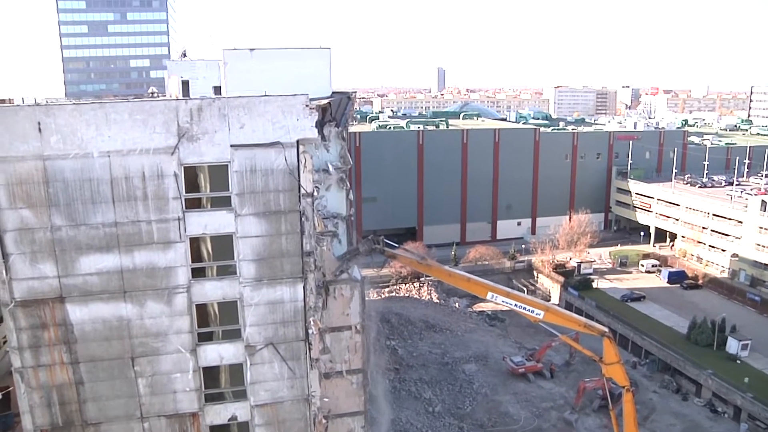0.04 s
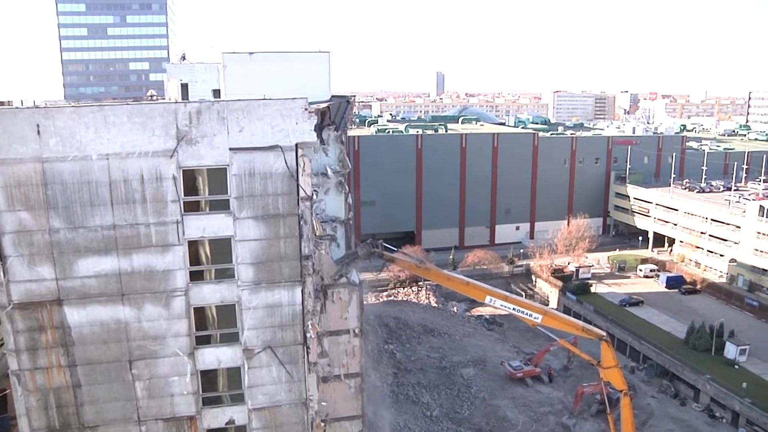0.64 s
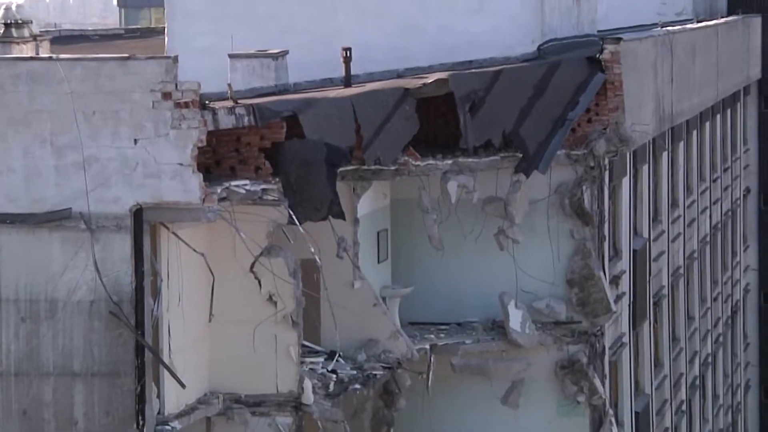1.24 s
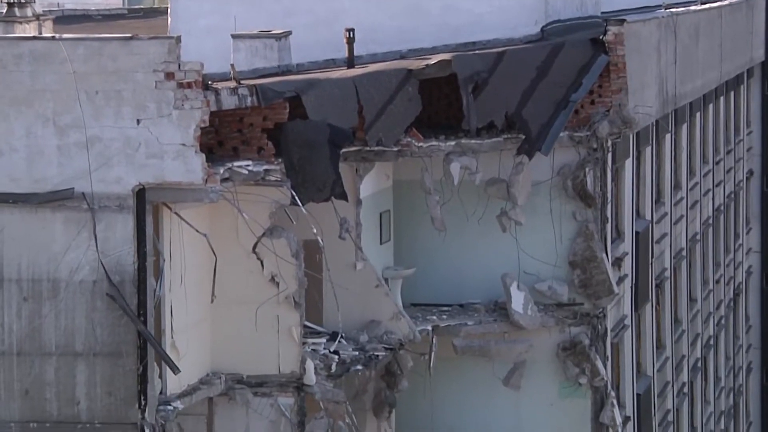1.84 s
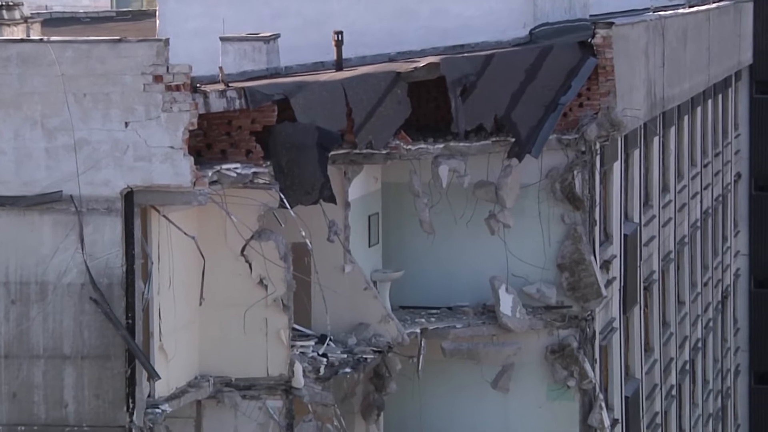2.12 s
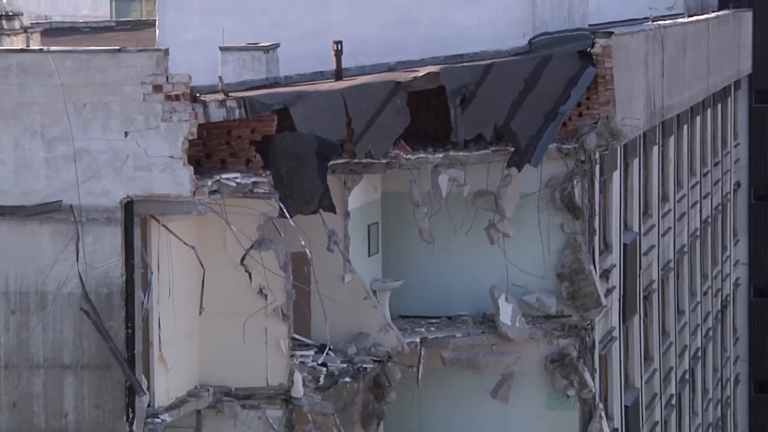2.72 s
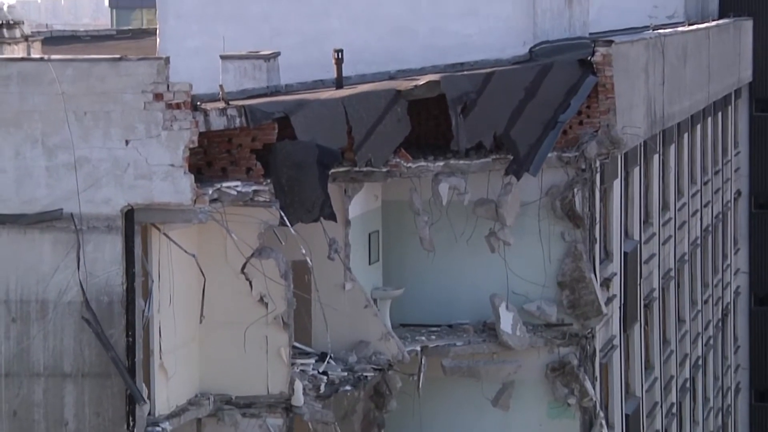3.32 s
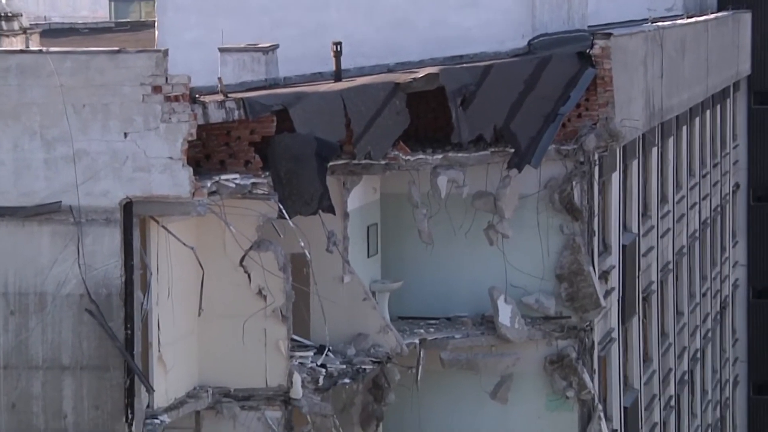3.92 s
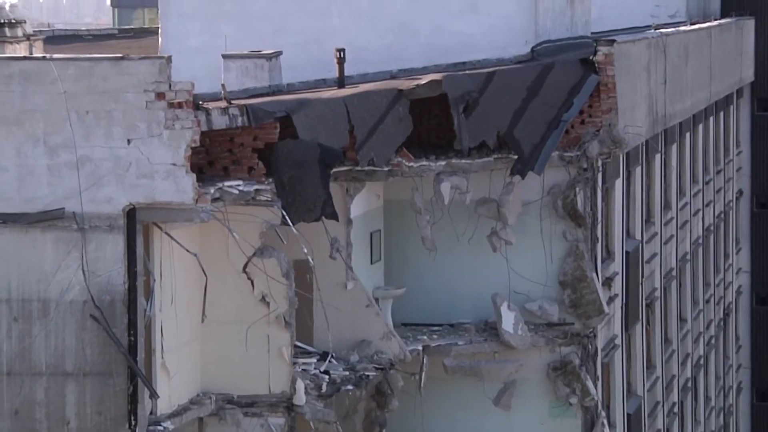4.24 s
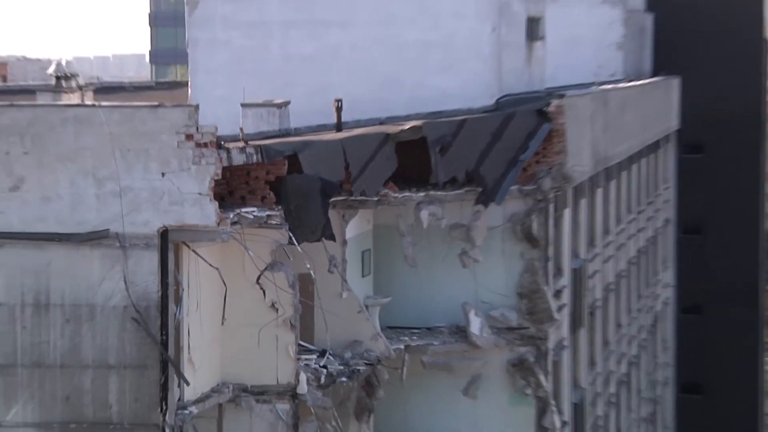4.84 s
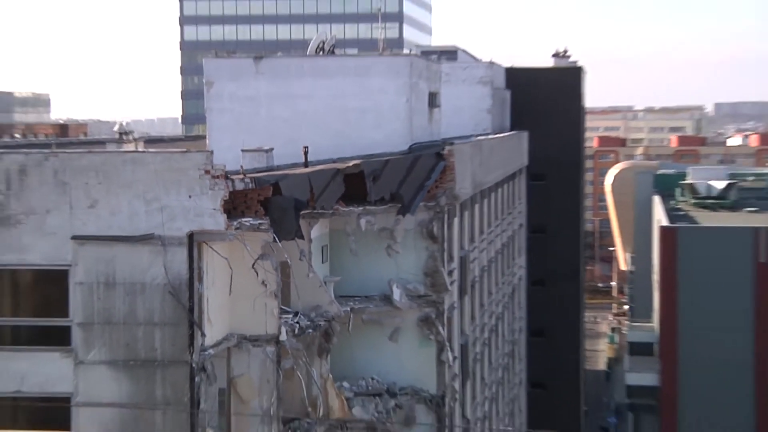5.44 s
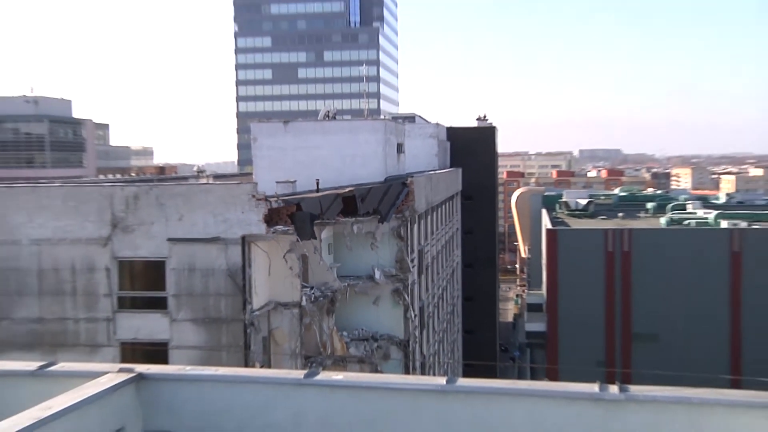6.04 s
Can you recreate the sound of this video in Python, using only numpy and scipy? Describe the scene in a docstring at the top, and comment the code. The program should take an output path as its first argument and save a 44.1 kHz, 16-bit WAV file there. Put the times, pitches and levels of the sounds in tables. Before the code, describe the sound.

A diesel excavator drones under load on a demolition site, with hissing spray, spurts of grit, a jolt and a few clanks. At 0.7 seconds this cuts abruptly to quieter distant traffic and the wavering hum of idling diesels. From 1 second, masonry tumbles down a building: bricks pour in surges, grit crackles and lumps land with dead knocks. Heavy slabs thud onto floors between 1.5 and 3 seconds, with strong crashes around 1.6, 2 and 2.9 seconds. Steel squeaks briefly at 1.2 and 3.2 seconds. The fall thins out, ending with a last knock just after 4 seconds. The town hum remains while a lorry gathers speed, its low tone rising until about 5.7 seconds. A faint zoom motor whirs close by from 4.3 seconds and fades. Soft gusts bump the microphone between 5.2 and 5.6 seconds, and the background runs on to 6 seconds.

```python
"""An excavator drones under load in a hiss of spray and sliding grit, on a demolition site.
After a sudden change of scene, masonry tumbles down a building for three seconds: bricks pour,
lumps knock, slabs thud on the floors and steel squeaks on steel. Idling diesels and the town remain;
a lorry gathers speed, a lens motor whirs and wind nudges the microphone."""
import sys
import numpy as np
from scipy import signal
from scipy.fft import rfft, irfft, next_fast_len
from scipy.io import wavfile
from scipy.ndimage import uniform_filter1d, map_coordinates

SR = 44100
rng = np.random.default_rng(int(sys.argv[2]) if len(sys.argv) > 2 else 0)


def transcribe(u):
    """Save the signal u as a 16-bit wav file named by the first command-line argument.

    u: samples, shape (n,) or (channels, n), limited to [-1, 1]; the rate is SR.
    q: integer samples, one column per channel.
    """
    v = np.clip(np.atleast_2d(u).T, -1, 1)
    q = np.round(v * 32767).astype(np.int16)
    wavfile.write(sys.argv[1], SR, q)


N = 267687
TIME = np.arange(N) / SR
POUR_ATTACK_S = 0.016

# heavy impact spectrum: f/Hz, level/dB
THUD_SPECTRUM = [(15, -7), (35, -1.5), (100, -2), (150, -3.5), (250, -10), (600, -76.5)]
# falling masonry: f/Hz, left-right coherence
FALL_COHERENCE = [(30, .97), (65, .91), (130, .82), (250, .72), (500, .73), (1000, .55), (2000, .48),
                  (3500, .75), (6000, .2), (12000, .05)]
# loads of masonry pouring down: t/s, hold/s, brick level/dB, grit level/dB
POURS = [(1.018, 0.13, -37.5, -69), (1.118, 0.13, -28.5, -44.5), (1.36, 0.05, -32.5, -48),
         (1.482, 0.14, -31.5, -48.5), (1.673, 0.014, -31, -46), (1.791, 0.19, -33, -46.5),
         (2.016, 0.028, -24.5, -34), (2.082, 0.06, -25, -38.5), (2.164, 0.079, -31.5, -45),
         (2.311, 0.024, -26.5, -42), (2.387, 0.13, -29, -43.5), (2.596, 0.21, -27, -40),
         (2.871, 0.018, -31, -41), (2.896, 0.018, -22.5, -33), (2.961, 0.084, -31, -42),
         (3.053, .03, -39.5, -44.5), (3.204, 0.05, -34, -50), (3.335, 0.046, -34.5, -48),
         (3.418, 0.051, -29.5, -42.5), (3.523, 0.35, -39, -61), (3.858, 0.066, -36, -52.5),
         (3.915, 0.059, -30.5, -51), (4.126, 0.019, -50, -71)]
# slabs landing on floors: t/s, thump level/dB, f/Hz, rumble level/dB
SLABS = [(1.509, -21.5, 125, -38), (1.532, -20, 105, -36), (1.553, -14, 62, -30), (1.582, -12, 80, -28.5),
         (1.659, -21.5, 60, -42), (1.947, -16, 66, -26), (2.051, -17.5, 95, -32), (2.327, -21.5, 59.6, -31),
         (2.361, -22, 85, -34.5), (2.614, -20, 100, -42), (2.706, -23.5, 55, -37), (2.915, -16, 83, -38),
         (2.986, -28, 115, -30.5), (3.009, -19, 121, -31)]


def amp(db):
    """Decibels to gain."""
    return 10 ** (np.asarray(db) / 20)


def unit(x):
    """Scale to rms 1."""
    return x / np.sqrt(np.mean(x ** 2) + 1e-20)


def along(points, hz):
    """Interpolate (f/Hz, value) points on a log axis."""
    f, v = np.transpose(points)
    return np.interp(np.log(hz + 1), np.log(f + 1), v)


def curves(rows):
    """One value per sample for each column after the time."""
    s, *cols = np.transpose(rows)
    return [np.interp(TIME, s, c) for c in cols]


def during(rows, fade_s):
    """Gate open over a table's time span, fading outside it."""
    return np.clip(1 + np.minimum(TIME - rows[0][0], rows[-1][0] - TIME) / fade_s, 0, 1)


def swell(s, hold_s, db, attack_s, t60_s):
    """Gain of one event: rise, hold, decay."""
    t = TIME - s
    return np.clip(t / attack_s, 0, 1) * amp(db - 60 * np.clip(t - attack_s - hold_s, 0, None) / t60_s)


def swells(rows, attack_s, t60_s):
    """Power sum of (t/s, hold/s, level/dB) events, as gain."""
    return np.sqrt(sum(swell(s, hold_s, db, attack_s, t60_s) ** 2 for s, hold_s, db in rows))


def wobble(rate_hz):
    """Smooth random curve with knots at rate_hz."""
    return map_coordinates(rng.standard_normal(int(N * rate_hz / SR) + 4), [TIME * rate_hz])


def filtered(x, response):
    """Apply a complex frequency response."""
    n = x.shape[-1]
    m = next_fast_len(n + 8192)
    return irfft(rfft(x, m) * response(np.fft.rfftfreq(m, 1 / SR)), m)[..., :n]


def resonance(hz, centre_hz, width_hz):
    """Gain of one resonance."""
    return 1 / (1 + ((hz - centre_hz) / (width_hz / 2)) ** 2)


def add(track, s, sound):
    """Mix a sound into a track at time s."""
    part = track[..., max(round(s * SR), 0):][..., :sound.shape[-1]]
    part += sound[..., :part.shape[-1]]


def tone(hz):
    """Sine of rms 1 on a pitch curve."""
    return np.sqrt(2) * np.sin(2 * np.pi * (np.cumsum(hz) / SR + rng.random()))


def noise():
    """Two independent white noises."""
    return rng.standard_normal((2, N))


def shower(rate_hz, spread_db, blur):
    """Random impacts of unequal size, blurred by their own echoes."""
    hits = (rng.random(N) < rate_hz / SR) * amp(spread_db * np.clip(rng.standard_normal(N), -2, 2))
    echo = np.sqrt(signal.lfilter([1], [1, -np.exp(-1 / (0.032 * SR))], hits ** 2))
    return unit(hits * noise()) + blur * unit(echo * noise())


def stereo(pair, spectrum, coherence):
    """Colour two independent signals and blend to left and right; mid rms 1."""
    def response(hz):
        angle = np.arccos(np.clip(along(coherence, hz), -1, 1)) / 2
        return amp(along(spectrum, hz)) * [np.cos(angle), np.sin(angle)]
    mid, side = filtered(pair, response)
    return np.array([mid + side, mid - side]) / np.std(mid)


def steadied(x, span_s):
    """Even out level changes slower than span_s."""
    return x / np.sqrt(np.abs(uniform_filter1d(np.mean(x ** 2, 0), int(span_s * SR))) + 1e-6)


def taps(rows, t60_s, width_ratio, rise_s):
    """Short blows, each ringing in one broad resonance."""
    out, t = np.zeros(N), np.arange(SR // 6) / SR
    for s, db, hz in rows:
        ring = unit(filtered(rng.standard_normal(len(t)), lambda f: resonance(f, hz, width_ratio * hz)))
        add(out, s, amp(db - 60 * t / t60_s) * (1 - np.exp(-t / rise_s)) * ring)
    return out


def thumps(rows, rise_cycles, highpass_hz=22):
    """Dead blows: a deep push peaking within a cycle, then a weaker rebound."""
    out, t = np.zeros(N), np.arange(SR // 8) / SR
    for s, db, hz, *_ in rows:
        age = t * hz / rise_cycles
        add(out, s, amp(db) * age * np.exp(1 - age) * np.sin(2 * np.pi * hz * t))
    return filtered(out, lambda f: 1j * f / (highpass_hz + 1j * f))


def walls(x):
    """Reverberation off the facades; treble dies first."""
    # facade decay: f/Hz, t60/s
    decay = [(100, .5), (1000, 0.66), (4000, 0.63), (12000, .12)]
    hz, t, bins = signal.stft(rng.standard_normal((2, SR // 2)), SR, nperseg=256)
    tail = signal.istft(bins * amp(-60 * t / along(decay, hz)[:, None]), SR, nperseg=256)[1]
    return signal.fftconvolve(x[None], tail / np.linalg.norm(tail[0]), axes=1)[:, :N]


def town():
    """Distant traffic and the wavering hum of idling diesels."""
    # traffic spectrum: f/Hz, level/dB
    spectrum = [(20, -8), (40, 0.5), (100, -3), (150, -6), (250, -10.5), (450, -13.5), (900, -21),
                (1900, -27), (2900, -35.5), (3600, -36), (4700, -48.5), (6000, -48.5), (8500, -52),
                (14000, -52.5)]
    # traffic: f/Hz, left-right coherence
    coherence = [(40, .96), (250, .93), (600, .9), (1000, .84), (2500, .75), (3600, .78), (5000, .15),
                 (6500, .3), (9000, 0)]
    # traffic envelope: t/s, level/dB
    envelope = [(.75, -38), (1.1, -40), (3.6, -40.5), (4.3, -41.5), (5, -41), (5.5, -40.5), (6.07, -41)]
    # diesel partials: f/Hz, level/dB
    partials = [(183.55, -42), (167.6, -47), (300, -56.5), (335, -60.5), (366, -61), (499.5, -58.5)]
    level_db, = curves(envelope)
    traffic = amp(level_db + 0.14 * wobble(5.3)) * stereo(noise(), spectrum, coherence)
    idle = sum(amp(db + wobble(6.5)) * tone(hz * (1 + 0.00405 * wobble(6.6))) for hz, db in partials)
    return traffic + idle


def lorry():
    """A lorry gathers speed: firing tone and its octave climb."""
    # engine run-up: t/s, firing f/Hz, level/dB
    run_up = [(3.7, 59.9, -58), (4.3, 68.3, -47), (4.5, 71.04, -37.5), (5.1, 78.9, -39),
              (5.3, 81.85, -40.5), (5.5, 84.7, -45), (5.63, 84.4, -37), (5.72, 85.7, -53)]
    hz, db = curves(run_up)
    engine = amp(db + 0.4 * wobble(6.4)) * (tone(hz) + amp(-18) * tone(2 * hz))
    return engine * during(run_up, fade_s=0.29)


def wind():
    """Soft gusts rumble and bump on the microphone."""
    # gusts: t/s, hold/s, level/dB
    gusts = [(5.215, 0.024, -35.5), (5.295, 0.056, -36), (5.565, .06, -39)]
    # bumps at the gust crests: t/s, level/dB, f/Hz
    bumps = [(5.243, -29, 165), (5.25, -32, 52), (5.319, -27, 161), (5.585, -31, 129), (5.617, -34, 84.9)]
    # rumble spectrum: f/Hz, level/dB
    spectrum = [(20, -12), (50, 0), (140, 6), (300, -5), (600, -18), (2000, -44), (6000, -120)]
    rumble = stereo(noise(), spectrum, coherence=[(60, 1.0), (300, 0.54)])
    gain = swells(gusts, attack_s=0.026, t60_s=0.23) * amp(0.77 * wobble(25))
    return gain * steadied(rumble, span_s=0.039) + thumps(bumps, rise_cycles=0.66)


def lens_motor(width_hz=310):
    """A zoom motor's rough whir sags and fades, with gear hiss above."""
    # motor run: t/s, whir level/dB, f/Hz, gear level/dB
    run = [(4.28, -100, 3570, -100), (4.34, -65.8, 3530, -77), (4.45, -68.5, 3496, -75),
           (4.6, -68, 3460, -73), (4.79, -69.5, 3400, -74), (4.88, -75, 3370, -74), (5.4, -81, 3380, -76),
           (5.7, -95, 3350, -83)]
    # gear hiss: f/Hz, level/dB
    spectrum = [(4300, -13.5), (5500, 0), (6600, -3.5), (7600, -2), (8400, -12), (12000, -16)]
    whir_db, hz, gear_db = curves(run)
    rasp = unit(filtered(rng.standard_normal(N), lambda f: resonance(f, 0, width_hz)))
    whir = rasp * (tone(hz) + .3 * tone(1.14 * hz))
    gears = stereo(noise(), spectrum, coherence=[(6000, .5)])
    return amp(whir_db - wobble(60)) * whir + amp(gear_db) * gears


def ticks():
    """Small, bright ticks close by."""
    # ticks: t/s, level/dB, f/Hz
    events = [(2.003, -51.5, 9000), (2.293, -55, 8600), (3.414, -63, 8160), (3.908, -60, 6500),
              (5.452, -58, 7100), (5.928, -57, 6960)]
    return taps(events, t60_s=0.0086, width_ratio=0.44, rise_s=.0004)


def excavator(rumble_settle_s=0.24):
    """A loaded diesel drones under crackling spray and grit; the boom jolts and clanks, steel rings."""
    # engine under load: t/s, firing f/Hz, level/dB
    engine = [(0.0, 194, -24.5), (0.038, 193.2, -35), (0.09, 192.7, -31), (0.11, 191.6, -40),
              (0.13, 193, -28.5), (0.276, 194, -31), (0.448, 186.8, -39), (0.458, 187.5, -32.5),
              (0.622, 197.6, -34), (0.725, 189.7, -32)]
    # machine rumble: f/Hz, level/dB
    rumble_spectrum = [(20, -2.5), (40, -9), (62, 6.5), (85, -8.5), (125, 0), (170, -1), (250, -4),
                       (420, -8), (620, -9), (800, -14), (1100, -27), (2000, -61)]
    # machine and spray: f/Hz, left-right coherence
    coherence = [(50, .92), (200, .96), (700, .95), (1800, .92), (3500, .96), (5000, .7), (7500, .88),
                 (12000, .6)]
    # spray flow: t/s, level/dB
    flow = [(0, -39.5), (.1, -37), (.33, -38), (.45, -38), (.52, -37), (.56, -39), (.73, -41)]
    # grit spurts: t/s, hold/s, fine level/dB, coarse level/dB
    spurts = [(0.06, 0.015, -43.5, -40), (0.112, 0.059, -54, -52), (0.185, 0.035, -46, -38.5),
              (.222, .005, -41.5, -47), (0.261, .006, -46, -52), (0.288, 0.011, -52, -34),
              (0.342, .004, -48.5, -50), (0.372, 0.019, -54, -38.5), (.43, 0.0044, -48, -50),
              (0.448, 0.0056, -38, -50), (0.463, 0.028, -41, -48), (0.491, 0.027, -51, -39),
              (0.596, 0.014, -55, -39), (0.62, .008, -45, -52), (0.656, 0.0064, -47, -36.5),
              (0.724, 0.019, -36, -49)]
    # spray and coarse grit: f/Hz, level/dB
    hiss_spectrum = [(500, -18), (900, 2.5), (1500, 1.5), (2400, 2.5), (2750, -3), (3500, 2.5),
                     (4100, -4.5), (5000, -14.5), (7000, -33)]
    # fine grit: f/Hz, level/dB
    fizz_spectrum = [(3800, -5), (5000, -8), (5700, 2), (7500, 0), (8300, -7), (9200, -8), (10500, -17.5),
                     (12500, -14.5), (14500, -36)]
    # steelwork modes: f/Hz, width/Hz, level/dB
    modes = [(1970, 22, -53), (2300, 110, -51), (2510, 36, -60), (3140, 24, -72), (3520, 36, -63),
             (3860, 29, -73)]
    # clanks and a crunch at the boom: t/s, level/dB, f/Hz
    blows = [(.047, -20.5, 610), (.058, -31, 454), (.197, -30, 900), (.483, -26, 3300), (.651, -24, 754)]
    hz, drone_db = curves(engine)
    drone = amp(drone_db) * tone(hz + 1.85 * wobble(23.6))
    rumble_db = -36 + 5.5 * np.exp(-(TIME / rumble_settle_s) ** 2)
    rumble = amp(rumble_db) * steadied(stereo(noise(), rumble_spectrum, coherence), span_s=0.11)
    jolt = swell(0.106, hold_s=0.028, db=-30, attack_s=0.012, t60_s=0.2)
    thump = jolt * steadied(stereo(noise(), THUD_SPECTRUM, coherence), span_s=0.043)

    hiss_db, = curves(flow)
    spurt_shape = dict(attack_s=0.0025, t60_s=0.028)
    coarse_spurts = swells([(s, hold, db) for s, hold, _, db in spurts], **spurt_shape)
    coarse = np.hypot(amp(hiss_db + 0.61 * wobble(41.8)), coarse_spurts)
    hiss = coarse * stereo(shower(rate_hz=1500, spread_db=4.5, blur=1.8), hiss_spectrum, coherence)
    fine_spurts = swells([(s, hold, db) for s, hold, db, _ in spurts], **spurt_shape)
    fine = np.hypot(amp(hiss_db - 10.5 + 1.2 * wobble(92.5)), fine_spurts)
    fizz = fine * stereo(shower(rate_hz=3000, spread_db=6, blur=1.7), fizz_spectrum, coherence)
    spray = hiss * amp([[.5], [-.5]]) + fizz * amp([[-.7], [.7]])

    def steel_response(f):
        return sum(amp(db) * np.sqrt(SR / 2 / width) * resonance(f, centre, width)
                   for centre, width, db in modes)
    steel = filtered(rng.standard_normal(N), steel_response)
    clanks = taps(blows, t60_s=0.069, width_ratio=0.23, rise_s=0.0056)
    return drone + rumble + thump + steel + clanks + spray


def squeaks(waver=0.011, chatter_db=3, third_db=-32):
    """Steel chatters on steel in two close, rough tones, echoed by the facades."""
    # squeaks: t/s, level/dB
    events = [(1.165, -50), (3.244, -42.5)]
    # steel modes: f/Hz, relative level/dB, t60/s
    modes = [(2420, -4, 0.15), (2477, 1, 0.16)]
    out, t = np.zeros(N), np.arange(SR // 3) / SR
    attack = 1 - np.exp(-t / .002)
    for s, db in events:
        for hz, mode_db, t60_s in modes:
            phase = 2 * np.pi * np.cumsum(hz * (1 + waver * wobble(500)[:len(t)])) / SR
            level_db = db + mode_db - 60 * t / t60_s + chatter_db * wobble(170)[:len(t)]
            add(out, s, amp(level_db) * attack * (np.sin(phase) + amp(third_db) * np.sin(3 * phase)))
    return out + amp(-8) * walls(out)


def debris(spectrum, rate_hz, spread_db, blur, span_s):
    """A steady shower of falling pieces, in stereo."""
    return steadied(stereo(shower(rate_hz, spread_db, blur), spectrum, FALL_COHERENCE), span_s)


def grit_flow():
    """Gain of the grit shed by the loads."""
    return swells([(s, hold, db) for s, hold, _, db in POURS], POUR_ATTACK_S, t60_s=0.3)


def crunch():
    """Pouring grit crackles, most where bricks are crushed."""
    # bricks crushed: t/s, hold/s, level/dB
    crushes = [(2.025, 0.011, -57), (2.09, .04, -64), (2.318, .006, -57.5), (2.48, .015, -72),
               (2.635, 0.064, -64), (2.666, 0.0044, -60), (2.897, 0.024, -53.5), (3.05, .02, -65),
               (3.43, .008, -64)]
    # crumb spectrum: f/Hz, level/dB
    spectrum = [(1500, -15), (3000, 14.5), (4000, 7), (4800, 4), (5800, 2.5), (7200, -8), (8500, -15.5),
                (12000, -27)]
    gain = np.hypot(swells(crushes, attack_s=0.011, t60_s=0.24), amp(-34) * grit_flow())
    return gain * debris(spectrum, rate_hz=2100, spread_db=7, blur=1.2, span_s=.04)


def lumps(ring_db=-2, ring_t60_s=0.071):
    """Each lump lands with a dead knock, a brief ring, a low push and a crack off hard ground."""
    # landings: t/s, level/dB, relative bass/dB, relative crack/dB, ring f/Hz
    landings = [(1.061, -35.5, -9, 0, 298), (1.118, -29, -13, -4, 323), (1.137, -25.5, -14, -7, 226),
                (1.216, -22.5, -9, -6, 298), (1.374, -24, -8, -16, 236), (1.481, -22.5, -13, -7, 210),
                (1.608, -23.5, -11, -2.5, 302), (1.686, -23, -6, -12, 212), (1.805, -24.5, -14, -22, 248),
                (1.883, -24.5, -12, -5.5, 345), (1.999, -20, -2.5, -20, 264), (2.021, -19, -17, -11, 276),
                (2.033, -24, -13, -5, 400), (2.042, -17, -14, -4.5, 345), (2.09, -22, -17, -3, 225),
                (2.152, -29, -11, -16, 333), (2.327, -21, -1, -6, 205), (2.418, -26, -14, -7, 450),
                (2.453, -31, -7, -5, 308), (2.612, -16.5, -19.5, -14, 307), (2.688, -25.5, -13, -1.5, 430),
                (2.79, -23.5, -18, -6, 329), (2.823, -29, -15, 0.5, 380), (2.889, -26, -15, 1, 430),
                (2.911, -20.5, -21, 0, 424), (2.942, -14, -21, -7, 430), (2.952, -16.5, -17, -16, 502),
                (2.983, -21, -15.5, -15, 358), (3.004, -19, -7.5, -11, 294), (3.104, -22.5, -11, -13, 250),
                (3.355, -21, -1.5, -20, 344), (3.478, -26, -9, -5, 390), (3.535, -23.5, -4, -21, 200),
                (3.797, -33, -12, -20, 253), (3.861, -24.5, -21, -10.5, 335), (3.904, -21.5, -18, -21, 257),
                (4.137, -28.5, 3, -26, 255)]
    # dead knock: f/Hz, level/dB
    knock_spectrum = [(60, -7.5), (140, -2), (230, 0), (420, -1), (560, -13), (900, -20), (2500, -70)]
    # hard crack: f/Hz, level/dB
    crack_spectrum = [(250, -11), (600, 4.5), (850, -10), (1400, -17), (2500, -35), (5000, -45.5),
                      (9000, -74.5)]
    out, t = np.zeros((2, N)), np.arange(SR // 5) / SR
    def burst(spectrum, t60_s, rise_s):
        coloured = stereo(rng.standard_normal((2, len(t))), spectrum, FALL_COHERENCE)
        return steadied(coloured, span_s=0.02) * amp(-60 * t / t60_s) * (1 - np.exp(-t / rise_s))
    for s, db, bass_db, crack_db, hz in landings:
        knock = amp(-3) * burst(knock_spectrum, t60_s=0.11, rise_s=0.0018)
        ring_gain = amp(ring_db - 60 * t / ring_t60_s) * (1 - np.exp(-t / 0.00092))
        ring = ring_gain * np.sin(2 * np.pi * hz * t)
        push = amp(bass_db) * burst(THUD_SPECTRUM, t60_s=0.13, rise_s=0.006)
        crack = amp(crack_db) * burst(crack_spectrum, t60_s=0.083, rise_s=0.00088)
        add(out, s, amp(db) * (knock + ring + push + crack))
    return out


def rubble(thud_db=-31.5, reference_load_db=-26, thud_exponent=0.45, slab_lead_s=0.038):
    """Bricks tumble and grit pours; big pieces thud with the bricks and around each slab."""
    # tumbling bricks: f/Hz, level/dB
    brick_spectrum = [(60, -9), (140, -1.5), (230, 1), (420, 0.5), (550, -5.5), (670, -7.5), (900, -15.5),
                      (1400, -28.5), (2500, -43), (5000, -75.5)]
    # pouring grit: f/Hz, level/dB
    grit_spectrum = [(400, -9), (900, 19.5), (1500, 7), (2400, -2), (3600, -8.5), (4800, -24), (6500, -28),
                     (9000, -42)]
    loads = swells([(s, hold, db) for s, hold, db, _ in POURS], POUR_ATTACK_S, t60_s=0.43)
    trickle = swell(1.13, hold_s=2.43, db=-37.5, attack_s=0.088, t60_s=0.48)
    bricks = np.hypot(loads, trickle)
    # a slab rumbles loose before landing; the floor shakes on
    shaking = swells([(s - slab_lead_s, 0, db) for s, _, _, db in SLABS], slab_lead_s, t60_s=0.57)
    heavy = np.hypot(amp(thud_db) * (bricks / amp(reference_load_db)) ** thud_exponent, shaking)
    thud = heavy * debris(THUD_SPECTRUM, rate_hz=90, spread_db=8.5, blur=0.97, span_s=0.087)
    tumble = bricks * debris(brick_spectrum, rate_hz=350, spread_db=1, blur=1.8, span_s=0.045)
    grit = grit_flow() * debris(grit_spectrum, rate_hz=900, spread_db=12.5, blur=1.6, span_s=0.077)
    return thud + tumble + grit


def masonry():
    """Masonry falls off to one side, so left and right differ in phase and level."""
    # left channel's lead: f/Hz, phase/rad
    lead = [(50, 0), (120, -.12), (250, -.45), (430, -1.0), (700, -1.55), (1050, -2.1), (1600, -1.6),
            (2500, -.45), (3800, 0)]
    # left minus right: f/Hz, level/dB
    tilt = [(80, -0.5), (220, -5.5), (500, -0.6), (1000, 0), (2000, 3), (6000, 1.5), (10000, 0)]
    sides = [[1], [-1]]
    fall = rubble() + crunch() + lumps() + thumps(SLABS, rise_cycles=.25)
    fall = filtered(fall, lambda hz: np.exp(.5j * along(lead, hz) * sides))
    return filtered(fall, lambda hz: amp(.5 * along(tilt, hz) * sides))


def scene(change_s=.742):
    """The excavator gives way abruptly to falling masonry over the town."""
    before = np.clip((change_s - TIME) / 0.0072, 0, 1)
    after = np.clip((TIME - change_s) / 0.011, 0, 1) ** 2
    foreground = masonry() + ticks()
    first_scene = excavator()
    second_scene = foreground + town() + lorry() + wind() + lens_motor() + squeaks()
    return before * first_scene + after * second_scene


def record(dry, cutoff_hz=14200):
    """Steep low-pass."""
    return filtered(dry, lambda hz: 1 / (1 + (hz / cutoff_hz) ** 80))


dry = scene()
out = record(dry)
transcribe(out)
```